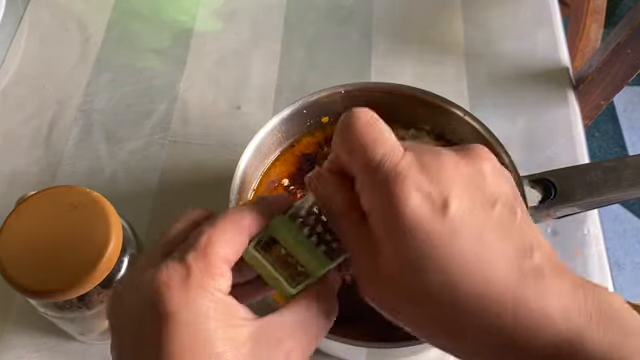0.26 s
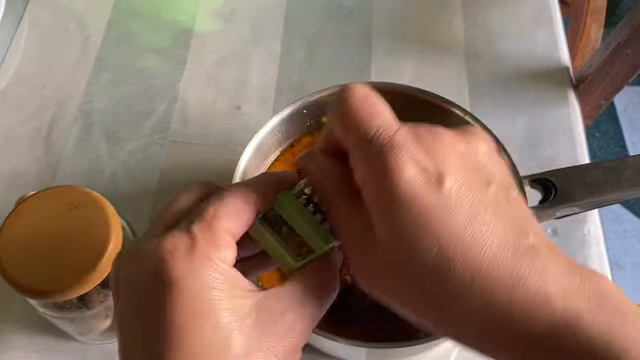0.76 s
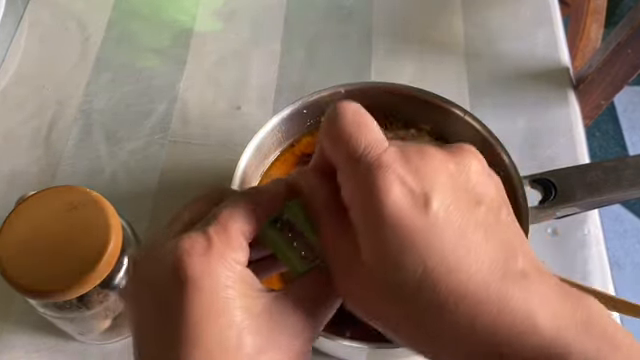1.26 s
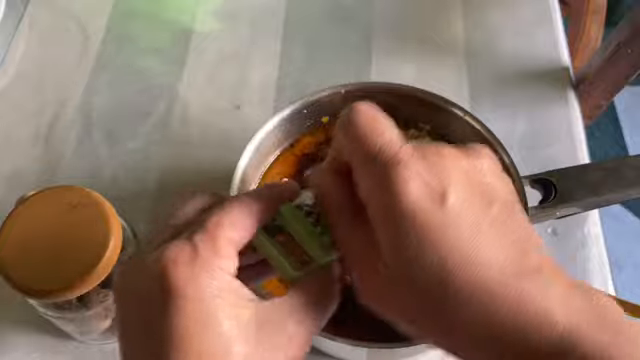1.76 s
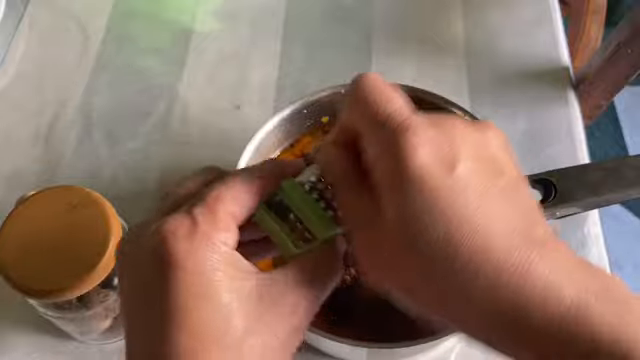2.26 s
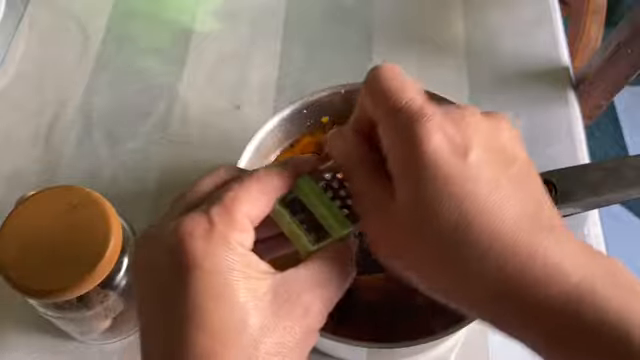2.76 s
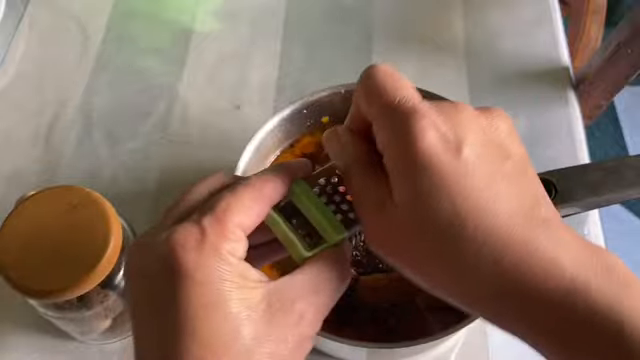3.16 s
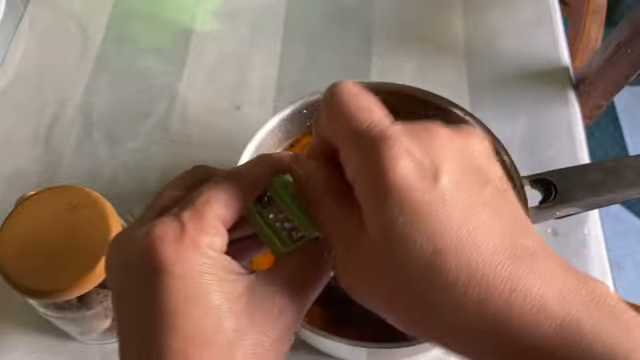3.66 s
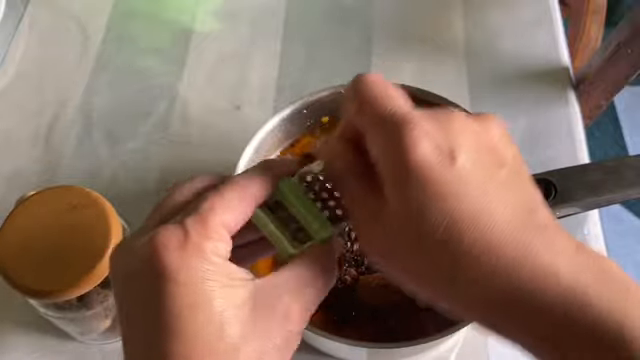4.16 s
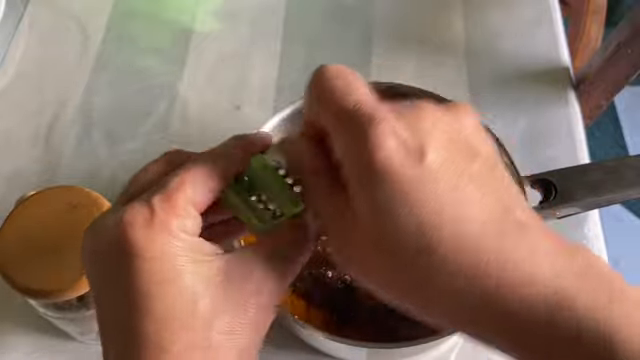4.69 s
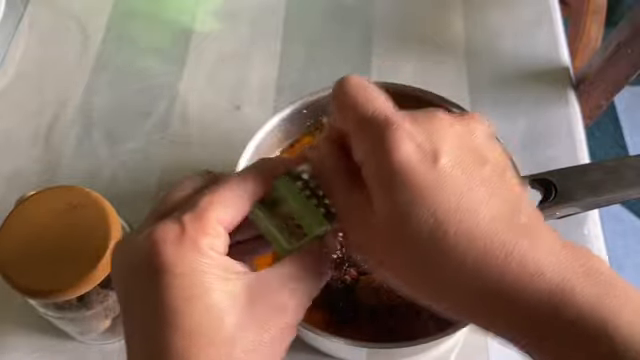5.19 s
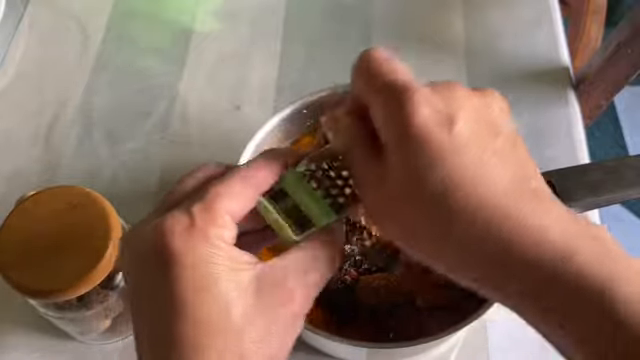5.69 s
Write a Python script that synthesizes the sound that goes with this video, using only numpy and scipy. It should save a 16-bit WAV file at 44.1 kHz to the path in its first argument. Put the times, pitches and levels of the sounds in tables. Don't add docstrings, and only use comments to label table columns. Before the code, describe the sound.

Brisk, regular dry scraping strokes of a nutmeg on a little toothed metal plate, crackly and bright, over a quiet kitchen and distant engine drone.

```python
import sys
import numpy as np
from scipy import signal
from scipy.fft import rfft, irfft, dct
from scipy.io import wavfile
from scipy.ndimage import uniform_filter1d

SR = 44100
rng = np.random.default_rng(int(sys.argv[2]) if len(sys.argv) > 2 else 0)


def volts_from_decibels(level):
    exponent = np.asarray(level, float) / 20
    return 10 ** exponent


def transcribe(u):
    v = np.clip(np.atleast_2d(u).T, -1, 1)
    q = np.round(v * 32767).astype(np.int16)
    wavfile.write(sys.argv[1], SR, q)


N = 261712


def rms_one(x):
    return x / np.sqrt(np.mean(x ** 2) + 1e-20)


def in_time(rows):
    s, *columns = np.transpose(rows)
    return [np.interp(np.arange(N) / SR, s, c) for c in columns]


def at_hz(rows, column, hz):
    rows = np.array(rows)
    return np.interp(np.log(hz + 1), np.log(rows[:, 0]), rows[:, column])


def drift(rate):
    r = np.exp(-2 * np.pi * rate / SR)
    noise = rng.standard_normal(N + SR)
    return rms_one(signal.lfilter([1], [1, -2 * r, r * r], noise)[SR:])


def colour(x, rows, column):
    shape_db = at_hz(rows, column, np.linspace(0, SR / 2, 2049))
    cepstrum = irfft(np.log(volts_from_decibels(shape_db)))
    cepstrum[1:2048] *= 2
    cepstrum[2049:] = 0
    return signal.fftconvolve(x, irfft(np.exp(rfft(cepstrum))))[:N]


def bandpass(x, low_hz, high_hz):
    return signal.sosfilt(signal.butter(2, [low_hz, high_hz], "band", fs=SR, output="sos"), x)


def resonate(x, hz, t60):
    r = volts_from_decibels(-60 / (t60 * SR))
    poles = [1, -2 * r * np.cos(2 * np.pi * hz / SR), r * r]
    return signal.lfilter(np.array([1, 0, -1]) * (1 - r * r) / 2, poles, x)


# start_s, firing_hz, load_db, second_order_db (relative to the first)
ENGINE_RUN = [(0, 61.9, -48, 2.5), (.95, 59.5, -46.5, 2), (1.1, 59.4, -37, 1), (1.25, 58.4, -50, 8),
              (1.5, 59.6, -44, 5), (2.35, 60.45, -44, -3), (2.6, 57.1, -36.5, 3), (2.9, 58.7, -46, 8.5),
              (3.43, 58.1, -33, -3), (3.55, 56.9, -44.5, -1), (3.75, 59.5, -39.5, 9),
              (3.96, 59.3, -33, -4.5), (4.15, 56.8, -43.5, -11), (4.8, 54.3, -43, -4),
              (5.0, 57.9, -43.5, 7), (5.93, 58.2, -44, -3)]


def engine():
    hz, load_db, second_db = in_time(ENGINE_RUN)
    turn = 2 * np.pi * np.cumsum(hz * (1 + 0.0074 * drift(4.4))) / SR
    first = volts_from_decibels(load_db + 0.5 + 0.42 * drift(2.7)) * np.sin(turn)
    second = volts_from_decibels(load_db + second_db - 1.1 + 3.4 * drift(5.7)) * np.sin(2 * turn)
    return np.sqrt(2) * (first + second)


# pitch_hz, level_db (per Hz), left_right_likeness (-1 to 1)
KITCHEN_NOISE = [(25.3, 6, .95), (50, -17.5, 0.72), (142, -3, 0.88), (335, -6, 0.61), (504, -11, 0.031),
                 (1140, -15.5, -0.58), (1360, -11, -0.28), (2130, -14.5, 0.5), (3570, -9.5, 0.47),
                 (6400, -13.5, 0.19), (8460, -10.5, -0.063), (10910, -12, -0.29), (17300, -16, -0.082)]


def kitchen():
    hz = np.fft.rfftfreq(N, 1 / SR)
    alike = np.clip(at_hz(KITCHEN_NOISE, 2, hz), -1, 1)
    mid, side = rfft(rng.standard_normal((2, N))) * volts_from_decibels(at_hz(KITCHEN_NOISE, 1, hz))
    both = np.sqrt(1 + alike) * mid + np.sqrt(1 - alike) * side * [[1], [-1]]
    low = 1 / (1 + (hz / 90) ** 4)
    load_db = in_time(ENGINE_RUN)[1]
    follow_db = 0.22 * (load_db - load_db.mean())
    rumble = volts_from_decibels(-26.5 + follow_db) * rms_one(irfft(both * low, N))
    hiss = rms_one(irfft(both * (1 - low), N))
    flutter = volts_from_decibels(3 * drift(12) - 4.5)
    hiss = hiss + (flutter - 1) * bandpass(hiss, 2300, 6500)
    return rumble + volts_from_decibels(-27 + 1.63 * drift(5.1)) * hiss


# start_s, contact_db (resting on the nut), looseness_db (of the hold)
HAND = [(0, -36, -12), (.3, -50, 10), (.75, -46, 7), (1.0, -40.5, 6), (1.22, -40, 1), (1.38, -60, -10),
        (1.62, -38, 9.5), (1.95, -38.5, -6), (2.36, -39, -7), (2.65, -40, 0), (2.9, -33.5, -16),
        (3.3, -60, 17), (3.6, -33.5, -3), (4.2, -43, 4), (4.6, -48, -2), (5.0, -43, 0), (5.4, -31.5, -1.5),
        (5.93, -34, -2)]


def hand_power():
    contact_db, loose_db = in_time(HAND)
    return volts_from_decibels([contact_db, contact_db + loose_db + 1.0, contact_db - 14.5]) ** 2


# start_s, length_s, rasp_db, ring_db (plate, relative)
PUSHES = [(0.04, 0.068, -30.5, 0), (0.232, 0.072, -27.5, 1), (0.439, 0.043, -27.5, -2),
          (.621, 0.035, -26.5, -0.5), (0.821, 0.057, -29, -0.5), (1.003, 0.062, -29, 6),
          (1.422, 0.054, -29.5, 2), (1.595, 0.041, -26, -4), (1.801, 0.038, -26, -20),
          (2.022, .031, -32, 5.5), (2.208, 0.036, -22, -18), (2.412, 0.031, -19, -1),
          (2.594, 0.036, -26.5, 1), (2.795, 0.037, -23, 1), (2.988, 0.044, -21.5, -5),
          (3.179, 0.049, -30, 3), (3.382, .047, -24.5, -1.5), (3.588, 0.027, -20, -4),
          (3.769, 0.066, -26, -2), (3.987, 0.053, -24, -0.5), (4.202, 0.048, -21.5, -2),
          (4.413, 0.049, -26.5, -5), (4.615, 0.042, -22, -2.5), (4.819, 0.035, -24.5, -14),
          (5.019, 0.039, -22, -6), (5.216, 0.054, -23.5, -2.5), (5.444, 0.058, -23.5, -1),
          (5.64, 0.05, -23, -6), (5.842, 0.053, -24.5, -0.5)]
# start_s, length_s, rasp_db, ring_db (plate, relative)
PULLS = [(0.14, 0.04, -29.5, -2), (0.529, 0.031, -23, -20), (0.717, 0.026, -29, -19),
         (0.906, 0.043, -29, -12), (1.122, 0.043, -29.5, -5), (1.499, 0.042, -32, 4.5),
         (1.698, 0.032, -28, 1), (1.922, 0.0057, -29.5, 5), (2.112, 0.026, -38, 9),
         (2.301, 0.017, -27.5, 0), (2.492, 0.031, -27, 2.5), (2.697, 0.036, -29, 2.5),
         (3.088, 0.025, -28.5, 4), (3.281, 0.026, -35.5, 5), (3.462, 0.067, -31.5, 2),
         (3.655, 0.068, -29.5, -0.5), (3.89, 0.032, -30.5, 6.5), (4.087, 0.05, -28, -4),
         (4.299, 0.059, -29.5, 3), (4.52, 0.025, -24.5, -2.5), (4.707, 0.055, -29.5, -14),
         (4.92, 0.028, -30.5, -12), (5.12, 0.036, -31.5, 3), (5.323, 0.03, -30, 1), (5.728, 0.027, -33, 1)]


def stroke_list():
    pushes = [(*row, 0.24) for row in PUSHES]
    pulls = [(*row, 0.65) for row in PULLS]
    return np.array(sorted(pushes + pulls))


def stroke_power(strokes, edge_s, lift_s):
    t = np.arange(N) / SR
    power = np.zeros((3, N))
    for s, length, db, ring_db, rise in strokes:
        peak, end = s + max(rise * length, .002), s + max(length, .005)
        span = slice(max(round((s - edge_s) * SR), 0), round((end + 4 * lift_s) * SR))
        knots_s = [s - edge_s, s, peak, end, end + lift_s, end + 4 * lift_s]
        shape_db = np.interp(t[span], knots_s, [-4.5, -0.5, 3.0, -2.0, -11.5, -19])
        power[:, span] += volts_from_decibels(db + shape_db + [[0.5], [ring_db], [-6]]) ** 2
    return power


# start_s, peak_db, ring_db (plate, relative)
NUT_SNAGS = [(0.0419, -9, 12), (0.2322, -7, 15), (0.2595, -6, 7), (0.631, -17, 5), (0.9965, -10, -2),
             (1.0015, -13, 4), (1.0135, -5, 7), (1.0185, -11, 2), (1.4427, -2, 5), (1.6058, -16, -13),
             (1.795, -4, -3), (2.0135, -9.5, -8.5), (2.051, -1.5, 2), (2.1916, -12.5, -9), (2.389, -3, 9),
             (2.403, 0, 0.5), (2.4134, -1.5, -4), (2.419, -4, 3), (2.5974, -7.5, -8), (2.782, -4, 0),
             (2.9798, -12.5, -10), (3.0067, -3.5, 2), (3.1915, -11, -4), (3.3781, -5.5, 10.5),
             (3.5757, -12.5, -9), (3.6109, -3.5, 3), (3.9832, -6, 1), (4.0089, -1.5, 3), (4.2041, 2, 0),
             (4.405, -8.5, -8), (4.6022, -7.5, -3), (5.0498, -2, 12.5), (5.2391, -3, 1),
             (0.1494, -0.5, 13.5), (0.53, -13, -8), (0.547, -10.5, 16), (0.557, -10, -6), (0.728, -7, 7),
              (0.736, -7, 7), (0.9066, -9.5, 3), (1.1084, -3.5, 10.5), (1.1303, -6.5, -1), (1.141, -6, 10),
              (1.424, -13, -3), (1.512, -10.5, 3), (1.533, -13.5, -6), (1.591, -16.5, -11),
              (1.692, -6.5, 5), (1.707, -18, -4), (1.8267, -5, 9), (1.915, -16, 12), (2.030, -10, -7),
              (2.107, -11, -10.5), (2.1332, -5, 10), (2.3244, -5.5, -6), (2.504, 0, 0.5), (2.518, -13, 1),
              (2.7038, -12.5, 2), (3.089, -16, -4), (3.891, -7.5, -3.5), (4.181, -16.5, -6),
              (4.192, -8.5, 10), (4.31, -5.5, 1), (4.806, -13, -2), (4.8494, -8, 1)]
# start_s, peak_db, ring_db (plate, relative)
TOOTH_BITES = [(0.0576, -10, -3.5), (0.062, -4, 5), (0.07, -6.5, -1), (0.079, -17.5, -15), (0.159, -10, 3),
               (0.1639, -2.5, 1), (0.1699, -10, 2), (0.1786, -2, 12), (0.2428, 0, 3), (0.2466, -5, -2),
               (0.4384, -15, 12), (0.4432, -4.5, 7), (0.449, -13, 0), (0.4645, -7, -3), (0.5211, -12, -3),
               (0.6051, -8, 12), (0.6235, -4, 2), (0.6494, -8, 1), (0.753, -6, 5), (0.804, -11, 5),
               (0.823, -14.5, -6), (0.8368, -3, 9), (0.846, -5, 2), (0.9172, -1.5, 4), (0.93, -9, -2),
               (1.027, 0, 1), (1.0404, -24, 0), (1.1537, -15, 1), (1.4342, -2, 5), (1.449, -3, 1),
               (1.4587, -3.5, 17), (1.4657, -15, 1), (1.5224, -6, 7), (1.6202, -9, 0), (1.6307, -1, 3),
               (1.64, -10, -2), (1.7188, -1, 1), (1.7268, -6, 8), (1.735, -10.5, -5), (1.8061, -16, 3),
               (1.8186, -19, 2), (1.9386, -12, 14), (1.9997, -10, 5), (2.1221, -13, -3), (2.2063, -8, -11),
               (2.2173, -10, -2), (2.2346, -8, -5), (2.3015, -7, 6), (2.3137, -12, -1), (2.3395, -1.5, 5),
               (2.3835, -8, 14), (2.427, -14, 1), (2.434, -7, 1), (2.4446, -12, 1), (2.498, -9, 2),
               (2.5721, -2, 12), (2.6084, -1.5, -4), (2.6184, -17, 2), (2.6227, -5, -1), (2.6883, -14, 8),
                (2.7916, -9, -8), (2.8035, -8, -6), (2.8097, -1.5, -8), (2.817, -3, 1), (2.9957, -13, -13),
                (3.0206, -1.5, -3), (3.105, -7, 3), (3.1824, -5, 5), (3.2081, -8, 2), (3.2132, -7.5, -3),
                (3.2893, -16, 16), (3.304, -5, 9), (3.3151, -7, -2), (3.3962, -2, 0), (3.411, 5, 10),
                (3.502, -13, -2), (3.5177, -19, 1), (3.5888, -1, 2), (3.6045, 5, 0), (3.6162, 3, 0),
                (3.625, -20, 0), (3.667, -11, 20), (3.693, -6.5, 6), (3.78, -5.5, -12.5), (3.7931, -10, -2),
                (3.798, -7.5, -5), (3.809, -3, -5), (3.816, -4.5, -1), (3.914, -13, 13), (3.925, 2, 13),
                (3.9955, 5, 12.5), (4.0016, -7, -0.5), (4.0203, 1.5, 1), (4.0285, -5, -6), (4.036, -9, -8),
                (4.0878, -13, -4), (4.1034, -10, -1), (4.1178, -13, 1), (4.135, -10, -5), (4.2198, -1, -9),
                (4.2253, -12, -1), (4.234, -8, 14), (4.25, -3, 17), (4.338, -7.5, -5), (4.354, -9, -2),
                (4.399, -10, -5), (4.412, -1, -3), (4.4164, -5, 0), (4.4266, -9, -5), (4.4388, -3, -4),
               (4.462, -5, 10), (4.506, -14, 4), (4.525, -13, 4), (4.5364, -15, 6), (4.547, -11, 7),
              (4.551, -2, 6), (4.612, -3.5, -7), (4.6225, -5, -2), (4.6309, -14, 1), (4.635, 2, 3),
              (4.643, -5.5, -2), (4.6523, -3.5, -7), (4.656, -8, 4), (4.7283, -3.5, 5), (4.7389, -18, -2),
              (4.747, -14, -7), (4.7585, -10, 1), (4.814, -9, -3), (4.821, -9, -7), (4.8324, -6, 0),
              (4.8405, -12, -2), (4.8568, -4.5, 18.5), (4.923, -8, 18), (4.938, -9, -7), (4.9634, -11, 3),
              (5.0162, -13, -4), (5.0274, -7.5, 1), (5.034, 0, 1), (5.14, -4.5, 10), (5.208, -6, 7),
              (5.215, -15, -3), (5.2199, -7, -3), (5.2288, -9, -12), (5.234, -9, -3), (5.244, -9, -2),
              (5.2496, -3, -7), (5.2573, -10, 21), (5.327, -12, 8), (5.3562, -9, 2), (5.434, -8.5, -8),
              (5.4478, -8.5, -7), (5.4694, -9, -3), (5.5364, -12, 6), (5.57, -6.5, 9.5),
              (5.642, -15.5, -20), (5.658, -11, -3), (5.6674, 4.5, 13), (5.744, -5, 3), (5.7563, -9.5, -5),
              (5.8303, -10, 19), (5.8402, -7.5, -8), (5.8567, -7, -3), (5.871, -2.5, 1), (5.889, -3, 5),
              (5.892, -8, -1)]


def tooth_power(bite_s, hold_s, release_s):
    bites = np.array(TOOTH_BITES) + [0, -5.5, 0]
    since = np.arange(round(.03 * SR)) / SR
    release = np.exp(-np.maximum(since - bite_s - hold_s, 0) / release_s)
    bite = np.minimum(since / bite_s, 1) * release
    power = np.zeros((3, N))
    for s, db, ring_db in np.vstack([NUT_SNAGS, bites]):
        span = power[:, round(s * SR):round(s * SR) + len(bite)]
        rasp, ring, tooth = db - 8.0 - 0.37 * ring_db, db - 19.5 + 0.83 * ring_db, db - 12.5 - 0.9 * ring_db
        span += (volts_from_decibels([[rasp], [ring], [tooth]]) * bite[:span.shape[1]]) ** 2
    return power


def fractures(per_s, spread_db):
    sizes = volts_from_decibels(spread_db * np.minimum(rng.exponential(1, N), 5)) * rng.choice([-1, 1], N)
    return rms_one(sizes * (rng.random(N) < per_s / SR))


PATCH_EDGES = [1500, 3000, 4500, 6200, 8500, 11500]


def patches(depth_db, rate):
    spectrum = rfft(fractures(per_s=9000, spread_db=1.7))
    hz = np.fft.rfftfreq(N, 1 / SR)
    below = [0 * hz] + [1 / (1 + (hz / edge) ** 8) for edge in PATCH_EDGES] + [1 + 0 * hz]
    total = np.zeros(N)
    for lower, upper in zip(below, below[1:]):
        total += irfft(spectrum * (upper - lower), N) * volts_from_decibels(depth_db * drift(rate))
    return rms_one(total)


# pitch_hz, left_lead_rad
LEFT_LEAD = [(200, -1.5), (700, 0.9), (1200, -1.04), (1750, 1.5), (2300, 3.5), (3000, 2.5), (4000, 1),
             (4600, -1.5), (5200, -1), (6300, -5)]


def chips_at_ports():
    common = patches(depth_db=2.5, rate=25)
    lead = np.exp(1j * at_hz(LEFT_LEAD, 1, np.fft.rfftfreq(N, 1 / SR)))
    judder = volts_from_decibels(1.2 * drift(110) + .6 * drift(40))
    ports = []
    for heard, share in [(irfft(rfft(common) * lead, N), .72), (common, .73)]:
        alone = fractures(per_s=11000, spread_db=1.0)
        ports.append(judder * (np.sqrt(share) * heard + np.sqrt(1 - share) * alone))
    return np.array(ports)


# pitch_hz, left_db (per Hz), right_db (per Hz)
RASP_COLOUR = [(227, -33.5, -45.5), (464, -5.5, -4), (868, -9, -17), (1010, -3, -7.5), (1650, -7, -8.5),
               (2140, 9, 4), (3320, 1, -8), (4900, -1.5, -3), (5660, 5, -5), (7425, 2, 0), (8360, 8.5, 6.5),
               (11400, 3.5, 8), (12230, 16, 15), (14000, 1.5, 3)]


def rasp(chips, force):
    low, high = [signal.sosfilt(signal.butter(2, 11000, kind, fs=SR, output="sos"), chips)
                 for kind in ("low", "high")]
    scraped = low * force + high * volts_from_decibels(-6.5) * force ** .75
    return volts_from_decibels(5.5) * np.array([colour(x, RASP_COLOUR, 1 + side) for side, x in enumerate(scraped)])


# pitch_hz, t60_s, left_db, right_db
PLATE_MODES = [(1384, 0.05, -10, -3), (1475, 0.017, -16, -15), (1896, 0.027, 0, 0), (2154, 0.14, 4, -9),
               (2162, 0.019, 0, 3.5), (2286, 0.0091, -3, -7), (2370, 0.03, -25, -3.5),
               (2526, 0.053, 3.5, 3), (2621, 0.0093, 1.5, -7), (2825, 0.0092, -2.5, -3.5),
               (3730, 0.071, -32, -28)]


def plate_ring(chips, force, stroke):
    grip = volts_from_decibels(2.2 * rng.standard_normal((len(PLATE_MODES), stroke.max() + 1)))
    out = np.zeros((2, N))
    for k, (hz, t60, *db) in enumerate(PLATE_MODES):
        r, w = volts_from_decibels(-60 / (max(t60, .005) * SR)), 2 * np.pi * hz / SR
        gain = volts_from_decibels(np.array(db) + 20.0)[:, None] * (1 - r) * np.sin(w) * (-1) ** k
        out += gain * signal.lfilter([0, 1], [1, -2 * r * np.cos(w), r * r], chips * force * grip[k, stroke])
    return out


# pitch_hz, t60_s, left_db, right_db
TOOTH_MODES = [(3590, 0.019, -5, 0.5), (4626, 0.0065, 0.5, -22), (6160, 0.017, -19, -2.5),
               (6800, 0.0057, -3.5, -1), (7550, 0.0047, -0.5, 0), (10930, 0.003, 3, -1)]


def tooth_twang(chips, force):
    out = np.zeros((2, N))
    for hz, t60, *db in TOOTH_MODES:
        struck = chips * force * volts_from_decibels(2.4 * drift(70))
        out += volts_from_decibels(np.array(db) + 6.0)[:, None] * resonate(struck, hz, max(t60, .003))
    return out


def grater():
    strokes = stroke_list()
    power = hand_power() + stroke_power(strokes, edge_s=0.012, lift_s=0.016)
    power += tooth_power(bite_s=0.0011, hold_s=0.0015, release_s=0.0014)
    rasp_force, ring_force, tooth_force = np.sqrt(power)
    stroke = np.searchsorted(strokes[:, 0] - .02, np.arange(N) / SR)
    chips = chips_at_ports()
    out = rasp(chips, rasp_force) + plate_ring(chips, ring_force, stroke) + tooth_twang(chips, tooth_force)
    frame_gain = volts_from_decibels(4 + 0.064 * in_time(HAND)[1])
    return out + (frame_gain - 1) * bandpass(out, 700, 1950)


# start_s, level_db
RIM_FREE = [(0, 0), (.45, -2), (.7, 14), (.95, -16), (1.4, -13), (2.2, -7), (2.46, 7), (2.75, -8),
            (3.3, 11), (3.9, -6), (4.25, 12), (4.55, 12), (4.85, 9), (5.05, 1), (5.5, -11), (5.93, -13)]
# pitch_hz, t60_s
FRAME_MODES = [(1310, 0.091), (1540, 0.058)]


def free_parts(scrape):
    free_db, t = in_time(RIM_FREE)[0], np.arange(N) / SR
    level = np.sqrt(uniform_filter1d(scrape ** 2, size=1500, axis=1) + 1e-9)
    evened = scrape * (0.04 / level) ** 0.93
    edge = resonate(evened * volts_from_decibels(free_db + [[1], [0]]), hz=2168, t60=0.13)
    slip_s, half_length_s = 5.5, 0.2
    freed = scrape * volts_from_decibels(3.5) * np.exp(-((t - slip_s) / half_length_s) ** 4)
    return edge + sum(resonate(freed, hz, t60) for hz, t60 in FRAME_MODES)


def saucepan(x, echo_db, t60):
    t = np.arange(round(.25 * SR)) / SR
    tails = rng.standard_normal((2, len(t))) * volts_from_decibels(-60 * t / t60) * (t > .001)
    tails /= np.sqrt(np.sum(tails ** 2, axis=1, keepdims=True))
    return volts_from_decibels(echo_db) * signal.fftconvolve(x, tails, axes=1)[:, :N]


def scene():
    scrape = grater()
    scrape = scrape + free_parts(scrape)
    return scrape + saucepan(scrape, echo_db=-10.5, t60=.16) + kitchen() + engine()


JOINT_HZ = 6750


def drop_weak_bands(x, below_db, whim_db, attack_db):
    band_lines, frame, frame_start = 16, 1024, 167
    pair = np.array([x[0] + x[1], x[0] - x[1]]) / 2
    pair = np.pad(pair, ((0, 0), (frame - frame_start, 3 * frame)))
    at = frame * np.arange(N // frame + 2)[:, None] + np.arange(2 * frame)
    window = signal.windows.kaiser_bessel_derived(2 * frame, 4 * np.pi)
    frames = pair[:, at]
    treble = np.sum(np.diff(frames) ** 2, axis=0)[:, :-127]
    eighths = treble.reshape(len(at), -1, 128).sum(axis=2) + 1e-12
    steady = np.max(eighths[:, 4:12] / eighths[:, 2:10], axis=1) < volts_from_decibels(attack_db) ** 2
    a, b, c, d = np.split(frames * window, 4, axis=2)
    lines = dct(np.dstack([-c[..., ::-1] - d, a - b[..., ::-1]]), 4, norm="ortho")
    power = (lines ** 2).reshape(2, len(at), -1, band_lines).sum(axis=3) + 1e-12
    band = np.arange(power.shape[2])
    apart = band < JOINT_HZ / SR * 2 * frame / band_lines
    whim = rng.standard_normal((2, len(at), 1)) + .6 * rng.standard_normal(power.shape)
    weak = power / power[::-1] < volts_from_decibels(-below_db - 2.6 * apart + whim_db * whim) ** 2
    weak &= steady[:, None] & (band >= 7)
    lines *= np.repeat(~weak, band_lines, axis=2)
    faint = lines ** 2 < 0.05 * np.repeat(power, band_lines, axis=2) / band_lines
    lines *= ~(faint & (np.arange(frame) > 60))
    p, q = np.split(dct(lines, 4, norm="ortho"), 2, axis=2)
    out = np.zeros_like(pair)
    for channel, kept in zip(out, np.dstack([q, -q[..., ::-1], -p[..., ::-1], -p]) * window):
        np.add.at(channel, at, kept)
    mid, side = out[:, frame - frame_start:][:, :N]
    return np.array([mid + side, mid - side])


def top_cut(x):
    return signal.sosfilt(signal.butter(12, 16460, fs=SR, output="sos"), x)


def record(dry):
    spectrum, hz = rfft(1.154 * np.tanh(dry / 1.402)), np.fft.rfftfreq(N, 1 / SR)
    lag_samples, in_step_hz = 10.2, 11150
    late = np.exp(-2j * np.pi * (hz - in_step_hz) * lag_samples / SR)
    joined = np.clip((hz - JOINT_HZ) / 700, 0, .86)
    spectrum[0] = np.sqrt(1 - joined) * spectrum[0] + np.sqrt(joined) * late * spectrum[1]
    ends = (1 + (hz / 15680) ** 200) * (1 + (37 / (hz + 1)) ** 12)
    mix = np.clip(volts_from_decibels(1.0) * irfft(spectrum / ends, N), -1, 1)
    mix = drop_weak_bands(mix, below_db=4.5, whim_db=1.6, attack_db=10.5)
    return top_cut(mix)


dry = scene()
out = record(dry)
transcribe(out)
```